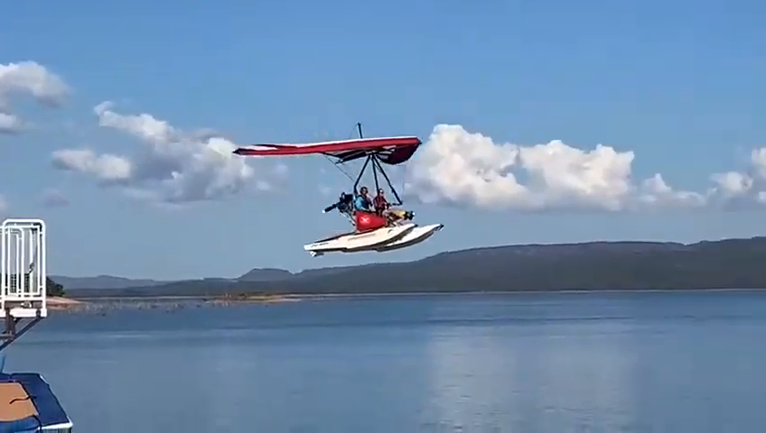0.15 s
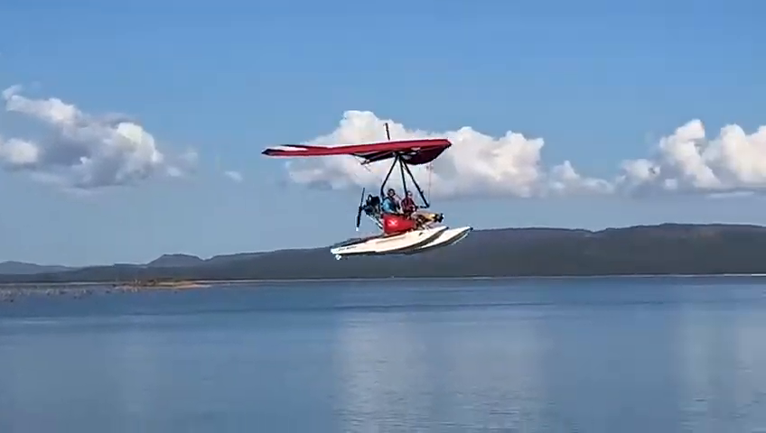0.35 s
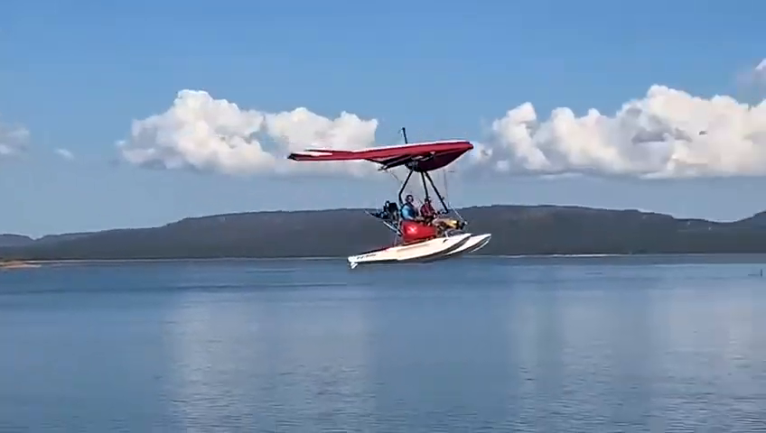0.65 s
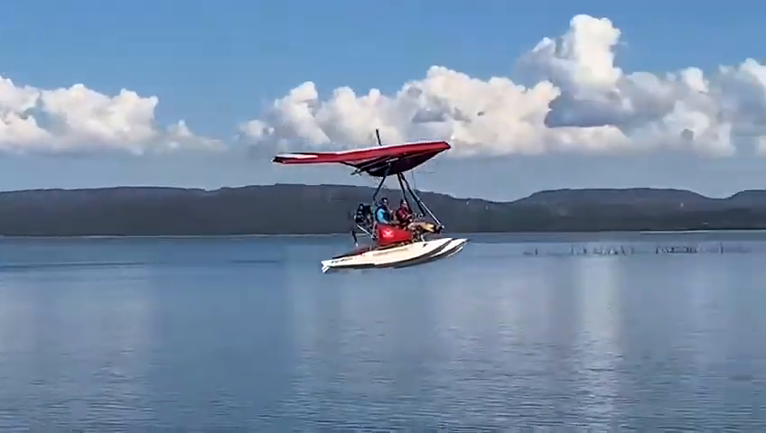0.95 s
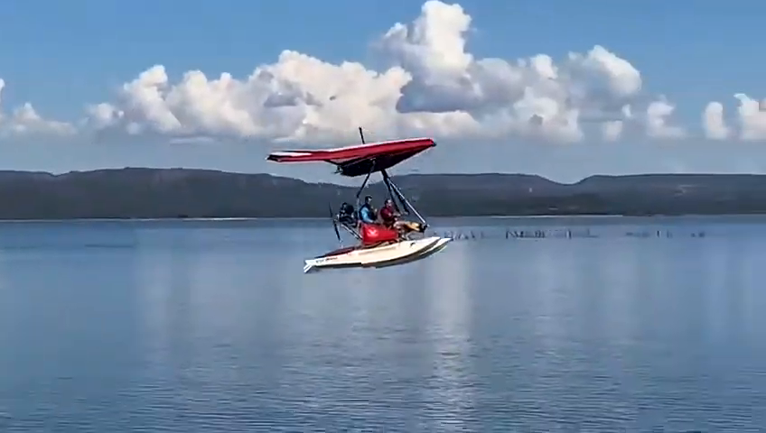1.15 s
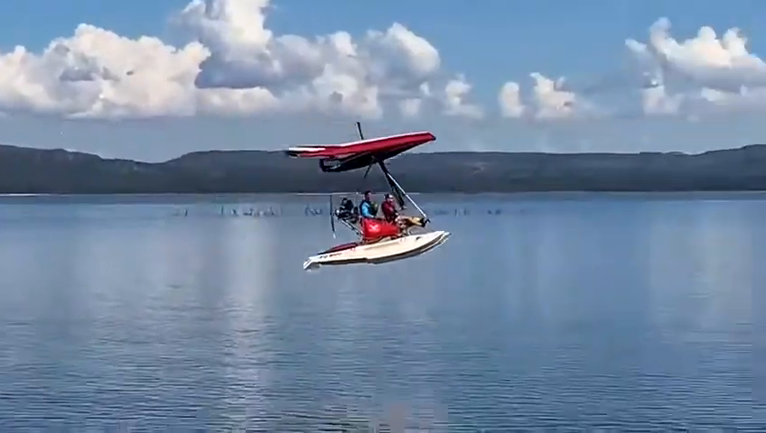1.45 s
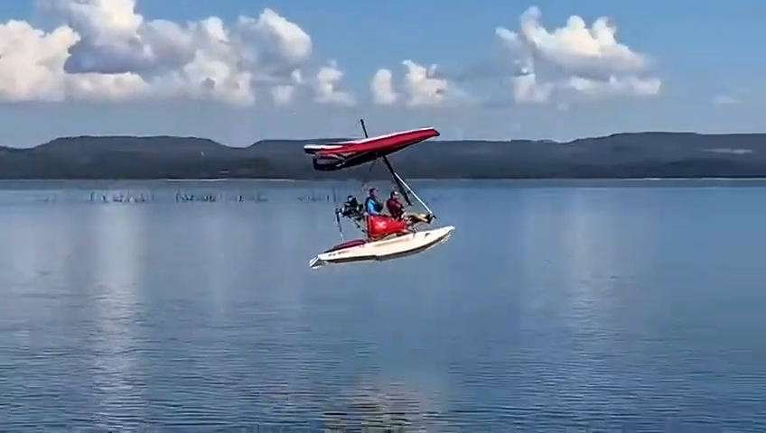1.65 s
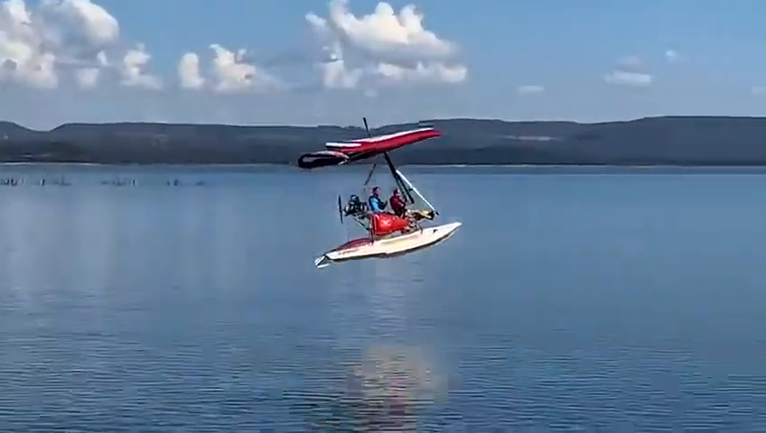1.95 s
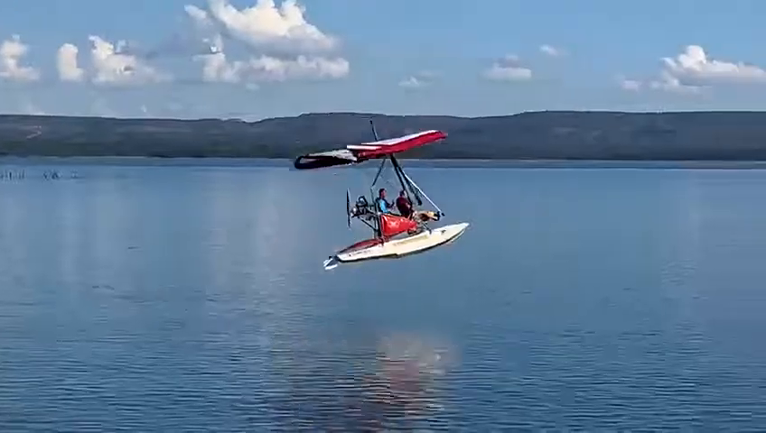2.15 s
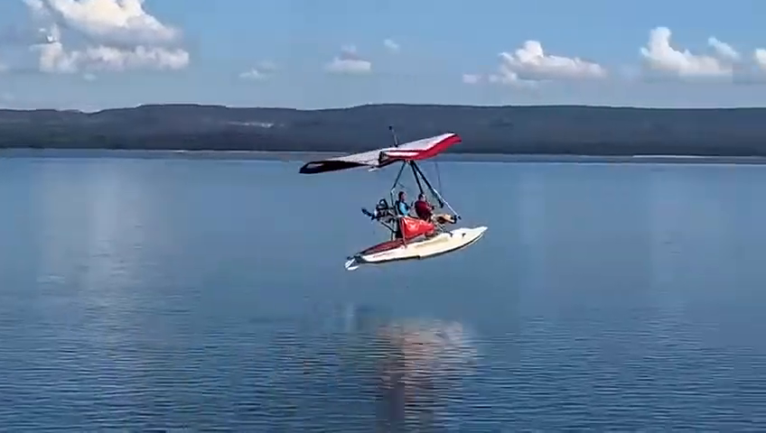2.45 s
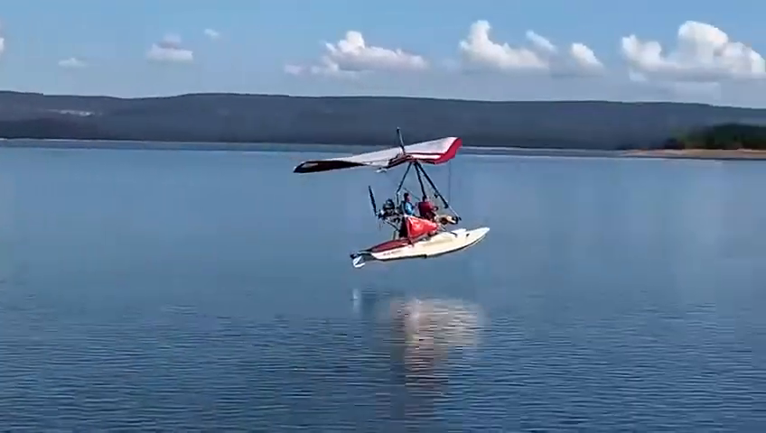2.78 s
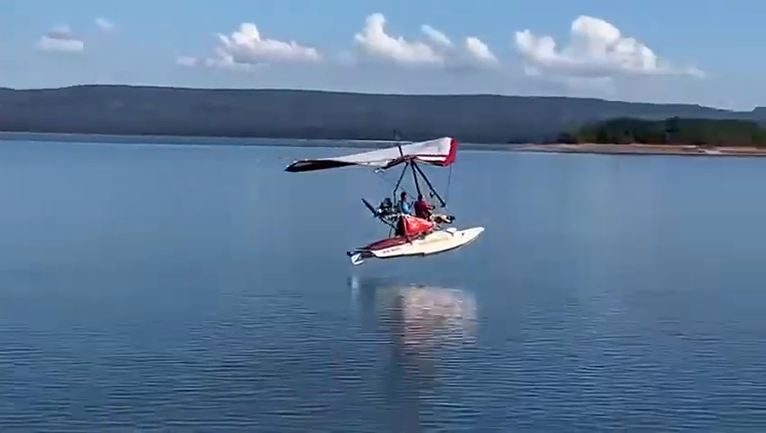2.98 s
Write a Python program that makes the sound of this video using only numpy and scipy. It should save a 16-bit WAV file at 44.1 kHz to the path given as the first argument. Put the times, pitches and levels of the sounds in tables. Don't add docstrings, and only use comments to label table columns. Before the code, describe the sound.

A light aircraft with a buzzy two-stroke engine drones throughout, low over a lake. At first the sound is thinner and raspier; from about 0.8 s the low exhaust tone swells, its pitch gradually sagging until the end at 3.1 s. Propeller hiss chops rapidly, strongest after 2 s. Four faint bird peeps fall between 0.3 and 0.8 s, over quiet electrical hum, distant low rumble and small wind thumps, with dulled treble.

```python
import sys
import numpy as np
from scipy import signal
from scipy.fft import rfft, irfft, next_fast_len
from scipy.io import wavfile
from scipy.ndimage import uniform_filter1d, map_coordinates

SR = 44100
rng = np.random.default_rng(int(sys.argv[2]) if len(sys.argv) > 2 else 0)


def waveform_to_disk(signal):
    frames = np.transpose(np.atleast_2d(signal))
    scaled = np.clip(frames, -1, 1) * 32767
    samples = np.round(scaled).astype(np.int16)
    wavfile.write(sys.argv[1], SR, samples)


def magnitude_from_level(level_db):
    exponent = np.asarray(level_db, float) / 20
    return 10 ** exponent


N = 137592


def unit(x):
    return x / np.sqrt(np.mean(x ** 2) + 1e-20)


def along(points, hz):
    f, v = np.transpose(points)
    return np.interp(np.log(hz + 1), np.log(f + 1), v)


def curves(rows):
    times, *columns = np.transpose(rows)
    return [np.interp(np.arange(N) / SR, times, column) for column in columns]


def wobble(rate):
    knots = rng.standard_normal(int(N * 60 / SR) + 4)
    return map_coordinates(knots, [np.arange(N) * min(rate, 60) / SR])


def smoothed(x, *sizes_and_axes):
    for size, axis in sizes_and_axes:
        x = uniform_filter1d(x, size=size, axis=axis)
    return x


def filtered(x, response):
    m = next_fast_len(N + SR // 2)
    return irfft(rfft(x, m) * response(np.fft.rfftfreq(m, 1 / SR)), m)[..., :N]


def coloured(x, spectrum):
    return unit(filtered(x, lambda hz: magnitude_from_level(along(spectrum, hz))))


def beam(t, centre, length):
    return np.exp(-(2 * (t - centre) / length) ** 2)


def patchy(patchy_db):
    z = signal.stft(rng.standard_normal((2, N)), nperseg=512)[2]
    field = smoothed(rng.standard_normal(z.shape[1:]), (5, 0), (12, 1))
    return signal.istft(z * magnitude_from_level(patchy_db * unit(field)), nperseg=512)[1][:, :N]


def exhaust(turns, exhaust_db):
    # multiple of firing rate, level/dB, share of the level swing it follows
    orders = [(.5, -21, -0.99), (1, -6.5, -0.081), (1.5, -26.5, -0.74), (2, 4.5, 1.22), (2.5, -33, 1.2),
              (3, 1.5, 1.146), (3.5, -20, 2.8), (4, -12, 1.78), (5, -40.5, -0.78), (6, -41.5, 0.77),
              (8, -32.5, 0.59), (9, -34.5, -0.31)]
    # t/s, level/dB an order among the low orders
    pipe_tilt = [(0, 0.077), (.6, 0.33), (1, 1.4), (1.5, 1.5), (1.9, 0.48), (2.3, 0), (2.7, .5),
                 (3.12, 0.96)]
    tilt_db = curves(pipe_tilt)[0]
    swing_db = exhaust_db - exhaust_db.max()
    top_db = exhaust_db.max() - 1.5
    tone = np.zeros(N)
    for k, db, share in orders:
        level_db = top_db + db + share * swing_db + tilt_db * np.clip(k - 2.5, -1, 1)
        level_db = level_db + 1.07 * wobble(4.705)
        wave = np.sin(2 * np.pi * (k * turns + rng.random()))
        fuzz = magnitude_from_level(-21.5) * wobble(40) * np.cos(2 * np.pi * k * turns)
        tone += magnitude_from_level(level_db) * np.sqrt(2) * (wave + fuzz)
    return tone


def passing_orders(turns):
    # multiple of firing rate, level/dB, t/s, length/s
    lobes = [(3, -51, 0.067, 0.56), (1.76, -48, .65, 1), (2, -46, .6, 1), (3.85, -58, 0.57, 0.87),
             (1, -52, 1.45, .7), (5, -57, 1.3, 0.81), (3.5, -60.5, 2.3, .4), (18, -54.5, 1.2, .4),
             (19, -61, 1.2, 0.11), (18, -61, 1.8, 0.73), (12.5, -61, 1.5, .5), (9, -56.5, 2.15, 0.91),
             (15, -59.5, 2.5, 0.43), (13, -59.5, 2.7, 0.94), (19, -52, 3.0, 0.24), (7.6, -56, .7, 0.44),
             (8.55, -56, .5, .5)]
    t = np.arange(N) / SR
    tone = np.zeros(N)
    for k, db, centre, length in lobes:
        wave = np.sin(2 * np.pi * k * turns + 0.37 * wobble(20))
        tone += magnitude_from_level(db + 2.0 * wobble(12)) * beam(t, centre, length) * np.sqrt(2) * wave
    return tone


def firing_pulses(turns):
    fired = np.flatnonzero(np.diff(np.floor(turns + 0.03 * wobble(45))) > 0)
    pulses = np.bincount(fired, magnitude_from_level(0.59 * rng.standard_normal(N)[fired]), N)
    return unit(pulses - pulses.mean()) * [[1], [0]]


def roar(gated, pulses, roar_db):
    # f/Hz, level/dB
    roar_spectrum = [(120, -3.5), (300, 2.5), (600, -9), (1200, -6.5), (2700, -9), (3300, -15),
                     (5800, -17.5), (9000, -28), (10500, -56)]
    return magnitude_from_level(roar_db + 2.5) * coloured(gated + magnitude_from_level(-14.5) * pulses, roar_spectrum)


def cowling(gated, pulses, roar_db):
    # f/Hz, width/Hz, level over the roar/dB, t/s,
    # length/s
    modes = [(1454, 150, -10, 0.14, 1.3), (906, 130, -9, 1.05, 0.58), (3397, 230, -11.5, 2.45, 2.14),
             (755, 340, -13.5, 0.35, 1.8), (906, 280, -6.5, 0.65, 0.33), (4810, 450, -14, 1.06, 0.15),
             (2404, 250, -9.5, 0.79, 0.48), (1685, 190, -8, 1.114, 0.7), (1654, 140, -5.5, 1.89, 0.62),
             (1156, 130, -8.5, 1.5, 0.52), (2400, 330, -7.5, 1.95, 0.44), (1113, 130, -10, 2.68, 1.2),
             (2910, 370, -7.5, 2.45, 1.65), (1666, 100, -12, 3.03, 0.24), (2456, 720, -14, 2.92, 0.52)]
    t = np.arange(N) / SR
    drive = gated + magnitude_from_level(-1.5) * pulses
    ringing = 0
    for hz, width, db, centre, length in modes:
        mode = filtered(drive, lambda f: (1j * f * width / (hz * hz - f * f + 1j * f * width)) ** 2)
        ringing = ringing + magnitude_from_level(roar_db + db) * beam(t, centre, length) * unit(mode)
    return ringing


def intake():
    # f/Hz, level/dB
    intake_spectrum = [(300, -44.5), (550, -11), (750, -6), (920, -15), (1020, -3), (1400, -41),
                       (2500, -120)]
    fade_db = -6 * np.arange(N) / SR
    return magnitude_from_level(-44 + fade_db + 1.3 * wobble(10)) * coloured(patchy(patchy_db=2.0), intake_spectrum)


def propeller(turns, swish_db):
    # f/Hz, level/dB
    hiss_spectrum = [(3000, -22), (5000, -22), (6500, -8.5), (7800, -8.5), (8600, -6.5), (9400, -19.5),
                     (10500, -50.5)]
    gear = 2.6
    rise, fall = 0.17, 0.29
    phase = (turns / gear + 0.13 + 0.04 * wobble(25)) % 1
    chop = np.exp(-phase / fall) - np.exp(-phase / rise)
    chop = chop / chop.max()
    depth_db = 10 + 0.5 * np.arange(N) / SR
    chop_db = depth_db * (1 + 0.058 * wobble(48)) * (chop - chop.mean())
    uneven_db = 2 * chop * np.cos(np.pi * turns / gear)
    return magnitude_from_level(swish_db - 1 + chop_db + uneven_db) * coloured(patchy(patchy_db=3.5), hiss_spectrum)


def plane():
    # t/s, firing rate f/Hz, exhaust level/dB, roar level/dB, propeller swish level/dB
    flight = [(0, 99.2, -51, -48.5, -62.5), (.25, 98.37, -47, -48, -59.5), (.45, 96.83, -55.5, -46.5, -57),
              (.65, 93.63, -46, -47, -60), (.82, 93.18, -41, -46, -62), (1.15, 92.8, -39, -46, -61.5),
              (1.45, 91.51, -36, -46, -66.5), (1.58, 91.87, -34.5, -47, -61.5),
              (1.78, 90.9, -35, -45.5, -59), (1.95, 90.64, -33.5, -47, -55.5),
              (2.25, 89.04, -33.5, -46.5, -50), (2.45, 88.43, -31.5, -47, -53.5),
              (2.62, 86.92, -32, -46, -52), (2.85, 87.3, -33.5, -44.5, -54.5),
              (3.12, 85.27, -32, -42.5, -55)]
    rate, exhaust_db, roar_db, swish_db = curves(flight)
    turns = np.cumsum(rate) / SR
    tone = exhaust(turns, exhaust_db) + passing_orders(turns)
    gated = unit(patchy(patchy_db=1.0) * (1 + 0.17 * np.cos(2 * np.pi * turns)))
    pulses = firing_pulses(turns)
    noise = roar(gated, pulses, roar_db) + cowling(gated, pulses, roar_db)
    return tone * [[1], [0]] + noise + intake() + propeller(turns, swish_db)


def water(x):
    # t/s, extra path/ms, reflected share
    reflection = [(0, 2.07, 1), (1.1, 1.92, 0.24), (2.2, 1.957, 0.4), (3.12, 1.994, 0.44)]
    delay_ms, share = curves(reflection)
    high = filtered(x, lambda hz: 1 / (1 + (650 / (hz + 1)) ** 6) / (1 + (hz / 2950) ** 4))
    arrival = np.arange(N) - delay_ms * SR / 1000
    late = np.array([map_coordinates(c, [arrival], mode="nearest") for c in high])
    return x - np.clip(share, 0, 1) * late


def bird():
    # t/s, peak level/dB
    peeps = [
        (0.3176, -43),
        (0.472, -46.5),
        (0.601, -44.5),
        (0.738, -45),
    ]
    t, half = np.arange(N) / SR, 0.019
    shape = sum(magnitude_from_level(db) * np.exp(-((t - start - half) / half) ** 4) for start, db in peeps)
    return shape * np.sin(2 * np.pi * 2790 * t + 2 * wobble(50))


def transformer():
    # f/Hz, rms level/dB
    hum_lines = [(120, -64), (240, -47.5), (480, -61)]
    t = np.arange(N) / SR
    return sum(magnitude_from_level(db + 0.19 * wobble(7.7)) * np.sqrt(2) * np.sin(2 * np.pi * (hz * t + rng.random()))
               for hz, db in hum_lines)


def distant():
    # f/Hz, level/dB
    far_spectrum = [(25, -30.5), (45, -13.5), (110, -0.5), (170, 20), (260, 5), (400, -50), (800, -120)]
    return magnitude_from_level(-43 + wobble(2.2)) * coloured(rng.standard_normal(N), far_spectrum)


def breeze():
    # t/s, level/dB, f/Hz, half length/s
    puffs = [(0, -56, 45, .016), (0.358, -33, 79, 0.0097), (0.467, -44.5, 50, 0.012),
             (0.599, -44, 70, 0.017), (.78, -44.5, 85, .016), (0.899, -45, 45, .02),
             (1.052, -44, 49.4, .03), (1.229, -44, 84.95, 0.022), (1.733, -40, 62, .02),
             (1.932, -36.5, 71.6, 0.01), (2.08, -47.5, 75.4, 0.025), (2.327, -44.5, 54, .014),
             (2.653, -39, 68.6, 0.012), (2.819, -43.5, 78.3, 0.022), (2.919, -44.5, 79.5, 0.014)]
    # f/Hz, level/dB
    rumble_spectrum = [(15, -41.5), (30, -13), (50, 1), (90, 0), (140, -9), (300, -52), (600, -120)]
    t = np.arange(N) / SR
    level = magnitude_from_level(-52.5 + 2.5 * wobble(8.34))
    common, other = coloured(rng.standard_normal((2, N)), rumble_spectrum) * level
    for centre, db, hz, half in puffs:
        swell = np.exp(-((t - centre) / half) ** 2)
        common = common + magnitude_from_level(db + 2.0) * swell * np.cos(2 * np.pi * hz * (t - centre))
    return np.array([common + 0.25 * other, 1.79 * common - 0.22 * other])


def cancelled(x):
    # f/Hz, width/Hz, depth/dB (sign ignored), t/s, length/s
    fades = [(423, 115, 9.5, 1.55, 1.35), (423, 69, 12, 2.6, 1.2), (326, 31, 15.5, 1.2, 0.83),
             (130, 40, 2, 0.98, 0.39), (530, 140, 3, 1, 0.3), (567, 150, -3, 2, 0.39),
             (1018, 120, 14, 0.98, 0.83), (2054, 160, 14, 1.2, .35), (2130, 220, 3.5, 0.44, 0.52),
             (1600, 120, 10.5, .15, 0.51), (1497, 140, 10, 2.1, 0.67), (1498, 73, 10.5, 2.8, .7),
             (1910, 79, 6.5, 3, 0.27), (3260, 140, -3, 0.98, .6), (3340, 690, 10, 0.055, 0.22),
             (3200, 340, 7, 0.25, 0.17), (3360, 250, 8, 1.8, 0.23), (2690, 68, 7, 0.91, 0.28)]
    hz, t, z = signal.stft(x, SR, nperseg=2048)
    loss_db = 0
    for f, width, db, centre, length in fades:
        offset = (2 * (hz[:, None] - f) / width) ** 4 + (2 * (t - centre) / length) ** 4
        loss_db = loss_db + abs(db) * np.exp(-offset)
    return signal.istft(z * magnitude_from_level(-loss_db), SR, nperseg=2048)[1][:, :N]


def ports(x):
    # f/Hz, phase/rad
    port_lead = [(20, -3.6), (130, -3), (260, -1.05), (350, -.2), (425, .05), (480, 1.3), (570, 3.1),
                 (750, 5.2), (920, 6), (990, 8.1), (1300, 6.3), (1480, 5.7), (1600, 6.6), (2050, 6.25),
                 (2280, 6.7), (2450, 6.3), (2590, 6), (2660, 9.2), (3050, 6.5), (3200, 3.3), (3350, 2.7),
                 (3600, .8), (3750, -3.1), (4500, -5.5), (4900, -3.4), (5700, -3.0), (6300, -2.2),
                 (7250, -.05), (7700, -.8), (8350, -np.pi)]
    # f/Hz, correlation
    coherence = [(100, 0.92), (400, 0.97), (1400, 0.69), (2100, 0.89), (3300, 0.82), (4200, 0.097),
                 (5000, 0.75), (5700, 0.69), (6400, 0.2), (7300, 0.91), (8350, 0.73)]
    f, lead = np.transpose(port_lead)

    def mixing(hz):
        angle = np.arccos(np.clip(along(coherence, hz), 0, 1)) / 2
        return np.array([np.cos(angle), np.sin(angle)])

    direct, scattered = filtered(x, mixing)
    pair = np.array([direct + scattered, direct - scattered])
    return filtered(pair, lambda hz: np.exp(.5j * np.interp(hz, f, lead) * np.array([[1], [-1]])))


def scene():
    shore = distant() + transformer() + bird()
    return ports(cancelled(water(plane()) + shore * [[1], [0]])) + breeze()


def thinned(x):
    # t/s, level/dB on the limits
    limit_drift = [(0, -1.5), (.7, 1.5), (.85, -0.5), (1.3, 2), (1.9, 1), (2.2, -1.5), (2.7, 2),
                   (3.12, 3.5)]
    # mid 0 or side 1, f/Hz, width/Hz, t/s, length/s
    silenced = [
        (0, 5650, 1000, 1, .36),
        (0, 5350, 600, .62, .3),
        (0, 5300, 600, 2.7, .14),
        (0, 5400, 400, 2.35, .4),
        (1, 7650, 650, 1.3, .85),
    ]
    hz, t, z = signal.stft(np.array([x[0] + x[1], x[0] - x[1]]) / 2, SR, nperseg=1024)
    column = hz[:, None]
    power = smoothed(abs(z) ** 2, (5, 1), (4, 2))
    drift = magnitude_from_level(2 * 2 * unit(smoothed(rng.standard_normal(z.shape), (10, 1), (10, 2))))
    drift *= magnitude_from_level(2 * np.interp(t, *np.transpose(limit_drift)))
    around = smoothed(power, (31, 1))
    keep = power > magnitude_from_level(2 * -8) * drift * power[::-1]
    keep &= power > magnitude_from_level(2 * -100) * drift
    keep &= power > magnitude_from_level(2 * -7.5) * drift * around
    keep |= column < 2500
    line = smoothed(abs(z) ** 2, (5, 2))
    keep &= (line > magnitude_from_level(2 * -3) * power) | (column < 2600)
    blocks = rng.standard_normal((len(hz) // 6 + 1, len(t) // 3 + 1))
    luck = np.kron(blocks, np.ones((6, 3)))[:len(hz), :len(t)]
    for ch, f, width, centre, length in silenced:
        patch = np.outer(abs(hz - f) < width / 2, abs(t - centre) < length / 2)
        keep[ch] &= ~patch | (luck > 1)
    edge_hz = 8400
    keep[1] &= (column < edge_hz + 900) | (luck > 1)
    top = column > edge_hz
    stray = (luck > 2.2 - keep[0]) & (column < 11400)
    keep[0] = np.where(top, stray, keep[0])
    z[0] += top * magnitude_from_level(-93) * np.exp(2j * np.pi * rng.random(luck.shape))
    mid, side = signal.istft(z * keep, SR, nperseg=1024)[1][:, :N]
    return np.array([mid + side, mid - side])


def top_cut(x):
    return signal.sosfilt(signal.butter(12, 11200, fs=SR, output="sos"), x)


def record(dry):
    return top_cut(thinned(dry))


dry = scene()
out = record(dry)
waveform_to_disk(out)
```